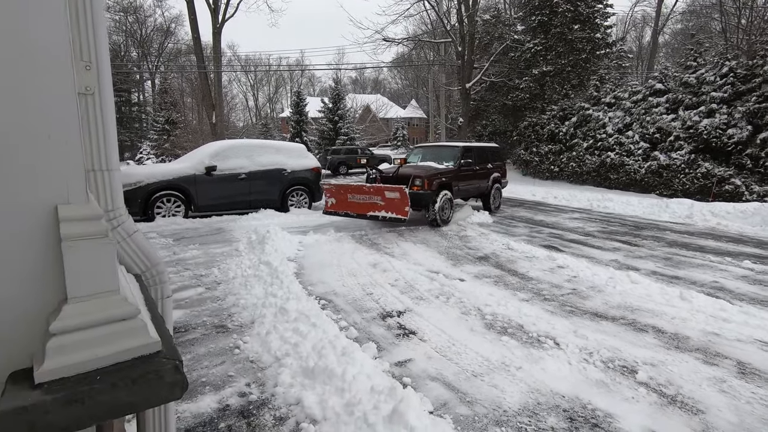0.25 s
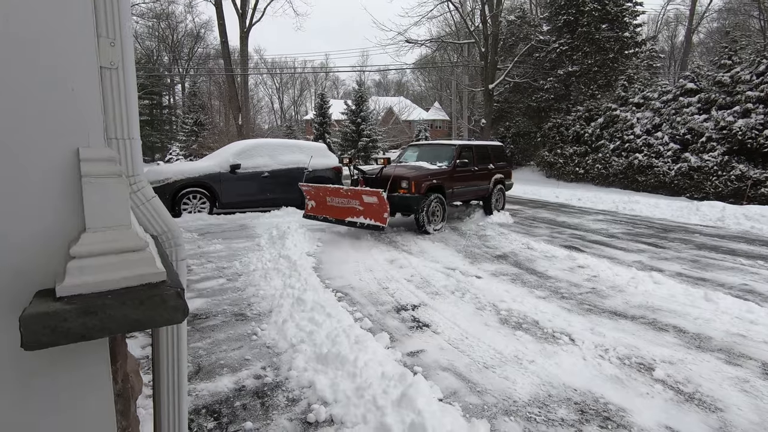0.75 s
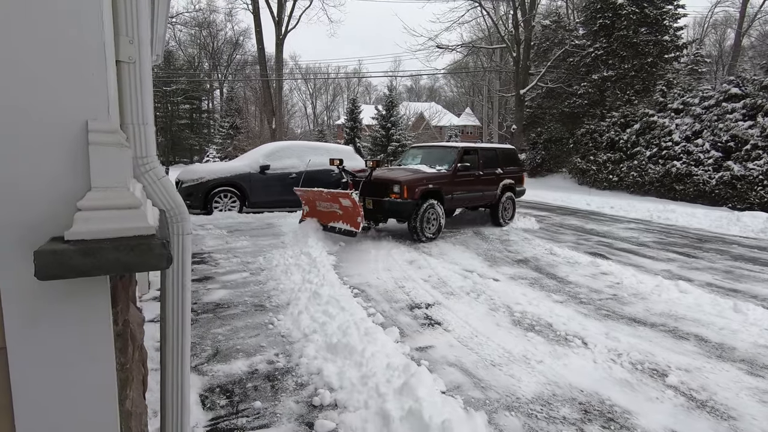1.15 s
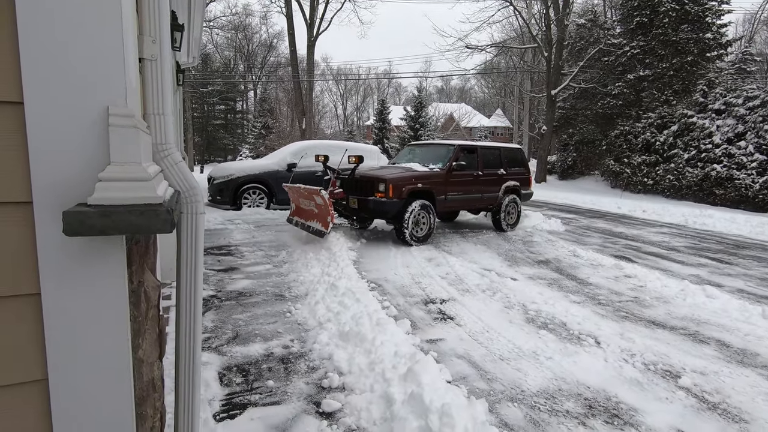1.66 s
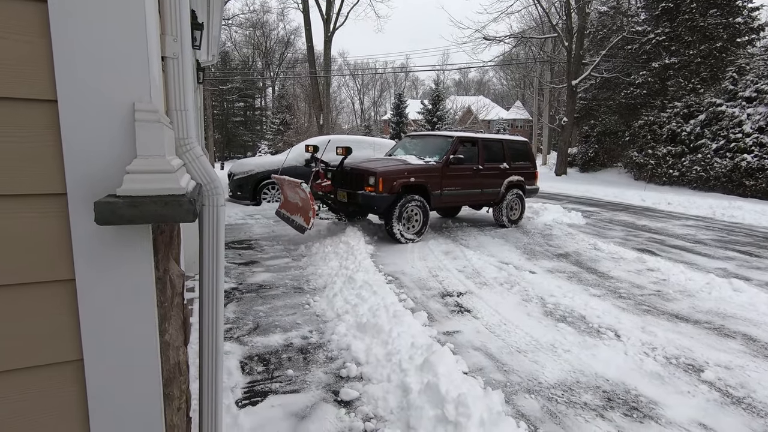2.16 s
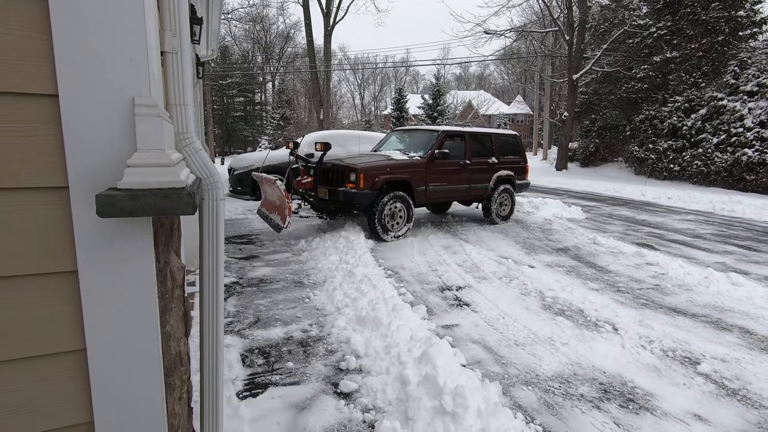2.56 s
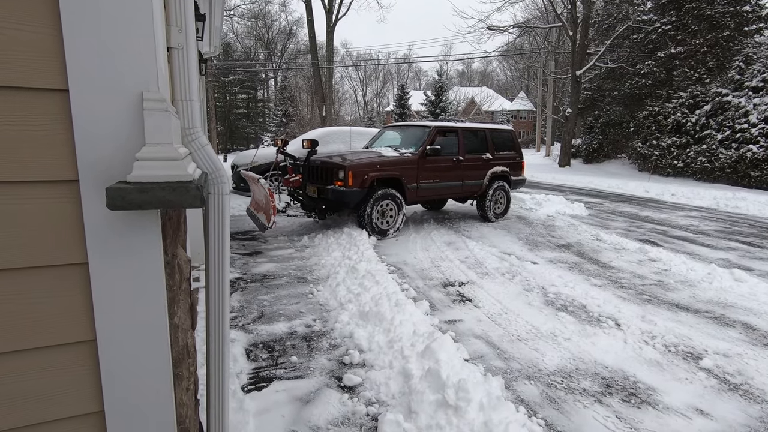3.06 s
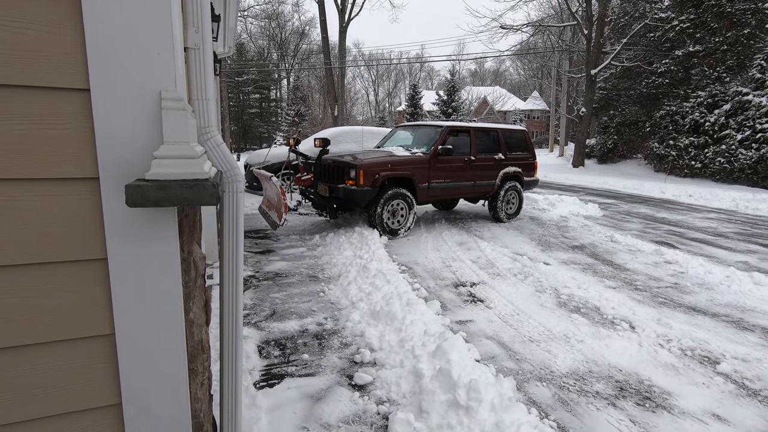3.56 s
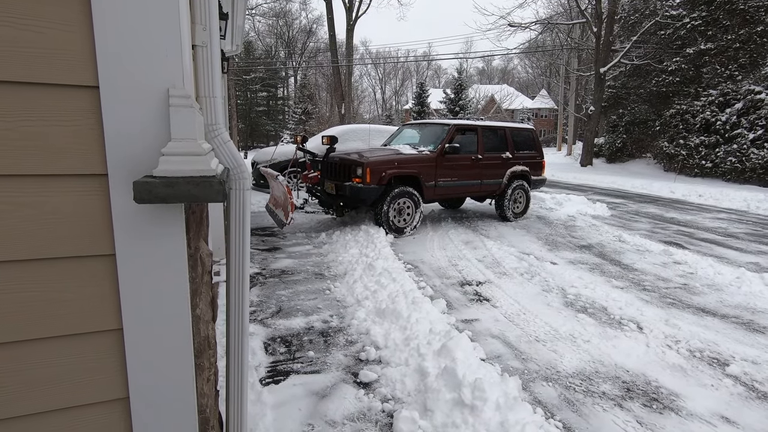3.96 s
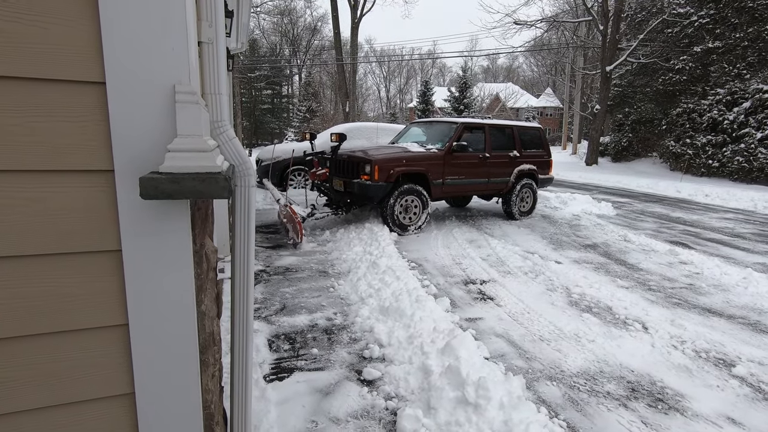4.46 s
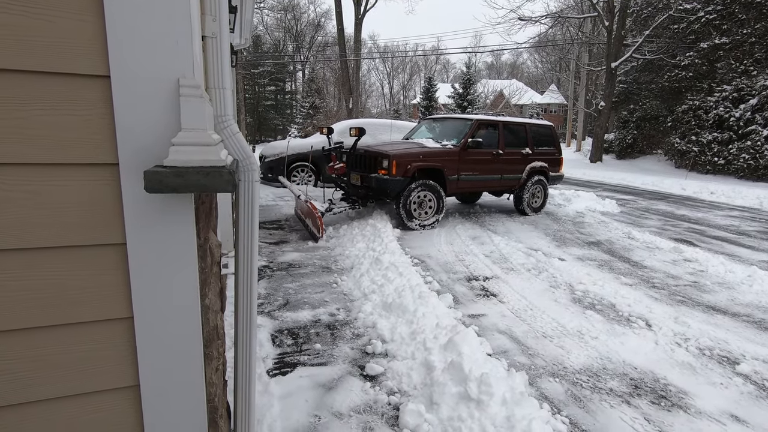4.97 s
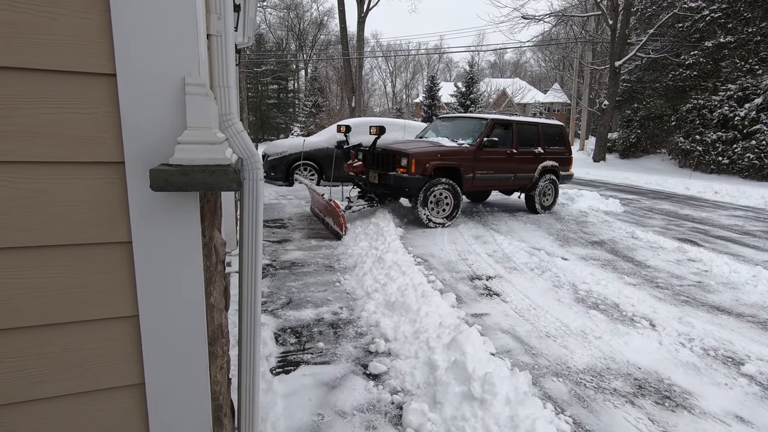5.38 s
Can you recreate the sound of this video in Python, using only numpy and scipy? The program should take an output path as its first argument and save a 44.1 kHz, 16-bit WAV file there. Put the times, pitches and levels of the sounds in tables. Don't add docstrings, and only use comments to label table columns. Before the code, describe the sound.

A truck engine booms low and unevenly over crunching snow, a pump whirs briefly, then a steel plow blade bangs down and scrapes pavement.

```python
import sys
import numpy as np
from scipy import signal
from scipy.fft import rfft, irfft, next_fast_len
from scipy.io import wavfile
from scipy.ndimage import uniform_filter1d, map_coordinates

SR = 44100
rng = np.random.default_rng(int(sys.argv[2]) if len(sys.argv) > 2 else 0)


def wav_out(sig):
    wavfile.write(sys.argv[1], SR, np.round(np.clip(np.atleast_2d(sig).T, -1, 1) * 32767).astype(np.int16))


def rack_gain(trim_db):
    fader = np.asarray(trim_db, float)
    return 10 ** (fader / 20)


N = 247842
T = np.arange(N) / SR

# time in seconds, crunch in dB over the mean pace.
SNOW_PACE = [
    (0, 0.3),
    (.24, 5),
    (.74, 2.3),
    (1.18, 6.5),
    (1.42, 7.5),
    (1.74, 2.5),
    (2.21, -2.5),
    (3.5, -10),
    (3.91, -7),
    (4.36, -1),
]
# frequency in Hz, level in dB per Hz.
CRUNCH_COLOUR = [(880, -31), (1500, -14), (1750, 2), (1910, -8), (2480, -10.5), (3060, -9), (4030, -12),
                 (4330, -16.5), (7210, -14.5), (10400, -38.5), (13500, -74), (22000, -120)]
# frequency in Hz, level in dB.
ALTERNATOR_CASE = [(1370, -50.5), (1700, -44.5), (1900, -46.5), (2060, -55)]
# frequency in Hz, level in dB per Hz.
CLATTER_COLOUR = [(160, -25.5), (280, -16), (361, -8), (437, -1.5), (470, -4.5), (506, -3), (993, -10.5),
                  (1380, -9), (2070, -17), (3120, -15.5), (5000, -29), (6500, -57), (11000, -120)]
# time in seconds, half the firing rate in Hz, throttle in dB.
ENGINE_SPEED = [(0, 26, -7), (.21, 25.8, -5), (.45, 28.7, -6), (.75, 25.1, -7), (.96, 22.5, -4),
                (1.17, 21.3, 0), (1.6, 21.2, 1), (2.1, 19.7, 0), (2.5, 19.5, 0), (3.3, 19.2, 0),
                (3.55, 18.2, 0), (3.72, 19.5, 1), (3.94, 21.8, 0), (4.32, 22.3, 1), (4.56, 26.1, 0),
                (4.85, 27.1, -1), (5.3, 27.6, 0), (5.62, 28.9, -4)]
# multiple of the pump tone, level in dB.
PUMP_OVERTONES = [(1, 1), (2, 1), (3, -5), (4, -9), (5, -6)]
# frequency in Hz, level in dB.
PUMP_HOUSING = [(450, 3), (800, 2), (1000, -8), (1300, -6), (1500, 3), (1800, -4), (2300, 2), (2700, -2),
                (3400, 1), (4100, -1)]
# time in seconds, frequency in Hz, level
# in dB, length in seconds.
BRIEF_TONES = [
    (1.383, 3400, -44, 0.035),
    (3.608, 3770, -53, 0.031),
    (3.54, 445, -48.5, 0.44),
    (4.45, 7260, -50, 0.023),
    (4.465, 7260, -36, 0.023),
    (4.465, 6200, -43, .03),
]
# time in seconds, then hollow part, bright part and low part in dB.
LINK_KNOCKS = [(0.09, -41.5, -45, -42), (0.21, -42, -39, -53.5), (0.675, -28, -52.5, -31),
               (0.74, -24, -52.5, -33), (0.772, -38, -63, -29.5), (0.809, -27.5, -48, -29),
               (0.882, -36, -52.5, -30), (1.305, -41.5, -36, -35.5), (1.491, -29, -49.5, -45),
               (1.549, -36, -49.5, -44.5), (1.599, -40.5, -45.5, -43), (2.099, -43, -45.5, -50.5),
               (2.273, -35.5, -43, -53), (2.867, -45.5, -58.5, -58), (3.348, -45.5, -47.5, -57.5),
               (3.539, -49.5, -47.5, -55), (4.003, -36, -46, -42.5), (4.044, -44.5, -47.5, -33.5)]
# frequency in Hz, width in Hz, level in dB.
FRAME_NOTES = [(460, 67, -0.5), (670, 78, -3.5), (1140, 98, -14)]
# frequency in Hz, level in dB.
FIRING_BOOM = [(36, -42), (39, -37.5), (42.4, -32), (47.5, -30.5), (52, -30.5), (54.5, -30.5), (56.2, -22),
               (58, -24)]
# frequency in Hz, level in dB.
UNEVEN_BOOM = [(55, -62), (64, -40.5), (72, -32.5), (78, -27), (88, -32.5)]
# frequency in Hz, level in dB.
SECOND_BOOM = [(73, -15.5), (77, -15.5), (79, -18), (85, -22.5), (88, -24.5), (104, -23), (110, -22.5),
               (116, -25)]
# frequency in Hz, level in dB.
FOURTH_BOOM = [(146, -46.5), (158, -41), (170, -36.5), (182, -39), (230, -39.5)]
# multiple of half the firing rate, level in dB.
UPPER_TONES = [(5, 2), (6, -1), (7, -8), (9, -4), (10, -2), (11, -8), (12, -8), (13, -11)]
# frequency in Hz, level in dB.
SILENCER = [(15, -1), (200, 0), (240, -7.5), (290, -27.5), (400, -47)]
# frequency in Hz, level in dB per Hz.
PUFF_COLOUR = [(12, -14), (25, -2), (45, -9), (76, -8), (110, -7), (170, 0), (230, -3), (300, -13),
               (420, -40)]
# time in seconds, level in dB.
LANDINGS = [
    (4.41, -8.5),
    (4.468, -20),
    (4.558, -33),
    (4.844, -33),
    (5.587, -29),
]
# frequency in Hz, level in dB, time to fade by 60 dB in seconds.
THUD_NOTES = [(165, -1, .13), (221, -1, .22), (250, -5, .15), (280, 0, .15), (345, -7, .22), (480, -13, .2),
              (635, -10, .25), (1184, -14, .1), (1430, -16, .12)]
# frequency in Hz, width in Hz, level in dB.
SLAM_NOTES = [(170, 70, -1), (235, 70, 0)]
# time in seconds, clang in dB, rattle in dB.
BLOWS = [(4.403, -24.5, -53.5), (4.409, -17, -40.5), (4.418, -23, -42), (4.436, -29.5, -31),
         (4.456, -23.5, -26.5), (4.468, -28.5, -30), (4.482, -25, -34), (4.557, -36.5, -37.5),
         (4.572, -33, -43.5), (4.59, -48, -72.5), (4.844, -28, -50), (4.904, -33.5, -42),
         (5.587, -21.5, -57)]
# frequency in Hz, width in Hz, level in dB.
CLANG_NOTES = [(660, 110, 5.5), (1133, 790, -3.5), (1650, 780, -3), (2940, 980, -10.5)]
# frequency in Hz, width in Hz, level in dB.
RATTLE_NOTES = [(3740, 1500, 3), (5280, 830, -0.5), (6200, 690, -5), (7260, 180, -1), (8800, 1800, -14),
                (12500, 4000, -30.5)]
# time in seconds, pressure in dB.
SCRAPE_PRESSURE = [
    (4.495, -0.5),
    (4.55, -8),
    (4.565, -2.5),
    (4.83, -8),
    (4.857, 0.6),
    (4.907, 4.5),
    (5.449, 9.5),
    (5.577, -7),
    (5.595, 1),
]
# frequency in Hz, width in Hz, level in dB.
PLATE_NOTES = [(140, 49, -0.5), (198.5, 56, -1), (251.8, 24.4, 3.5), (346, 5.2, -25.5)]
# frequency in Hz, width in Hz, level in dB.
EDGE_NOTES = [(494, 23, -8.5), (612, 25, -4), (670, 18.5, 1), (785, 55, -2.5), (879, 37, -5.5),
              (927, 64, -4), (1028, 22, -7), (1092, 33, -8.5), (1255, 30, -12), (1492, 84, -9.5),
              (1663, 160, -18), (2060, 560, -29)]
# frequency in Hz, width in Hz, level in dB.
RIM_NOTES = [(1370, 840, -12), (2070, 730, -12), (2646, 270, -7), (3080, 66, -10), (3270, 110, -13),
             (3970, 1500, -22.5), (5000, 680, -24.5), (6900, 2200, -33.5)]
# start in seconds, frequency in Hz, width in Hz, level in dB.
WEAR_STRIP = (4.84, 2230, 60, -7)
# frequency in Hz, level in dB.
DEAD_BANDS = [(340, -2.5), (430, -1.5), (540, -0.5), (2300, 1), (2400, -7), (2500, -2.5), (3400, -1.5),
              (3900, -3.5), (7200, -5), (9500, -5.5)]
# frequency in Hz, time to fade by 60 dB in seconds.
YARD_ECHO = [(100, 0.12), (1000, 0.39), (8000, 0.078)]
# frequency in Hz, side minus mid in dB.
ECHO_WIDTH = [(60, -30), (110, -27), (190, -34.5), (330, -22.5), (580, -15.5), (1030, -10.5), (1810, -10.5),
              (3190, -15), (5630, -4.5), (9930, 7.5)]
# frequency in Hz, left minus right in dB.
LEFT_LEAN = [(100, 2), (300, -0.9), (700, -0.5), (1400, -2.5), (2800, 0.7), (5000, -4), (9000, -6)]
# frequency in Hz, level in dB.
MICROPHONE = [(20, -4), (40, 1), (8000, -2.5), (10000, -13.5), (11500, -25), (16000, -21)]


def unit(x):
    return x / np.sqrt(np.mean(x ** 2) + 1e-20)


def along(points, hz):
    f, v = np.transpose(points)
    return np.interp(np.log(hz + 1), np.log(f + 1), v)


def curves(rows):
    s, *cols = np.transpose(rows)
    return [np.interp(T, s, c) for c in cols]


def ramp(start_s, length_s):
    return np.clip((T - start_s) / length_s, 0, 1)


def wobble(rate):
    return map_coordinates(rng.standard_normal(int(N * rate / SR) + 4), [T * rate])


def filtered(x, response):
    m = next_fast_len(N + SR // 2)
    return irfft(rfft(x, m) * response(np.fft.rfftfreq(m, 1 / SR)), m)[..., :N]


def coloured(x, points):
    return filtered(x, lambda hz: rack_gain(along(points, hz)))


def resonant(x, modes):
    def response(f):
        total = 0
        for k, (centre, width, db) in enumerate(modes):
            peak = 1j * f * width / (centre * centre - f * f + 1j * f * width)
            total = total + (-1) ** k * rack_gain(db) * peak
        return total
    return filtered(x, response)


def grit(fine_db, lump_db, lump_rate):
    return unit(rng.standard_normal(N) * rack_gain(fine_db * wobble(500) + lump_db * wobble(lump_rate)))


def ring(modes, t):
    return sum(rack_gain(db - 60 * t / t60) * np.sin(2 * np.pi * hz * t) for hz, db, t60 in modes)


def burst(db, t60, t):
    return rack_gain(db - 60 * t / t60) * rng.standard_normal(len(t))


def add_at(track, start_s, sound):
    track[round(start_s * SR):][:len(sound)] += sound


def engine_turning():
    half_hz = curves(ENGINE_SPEED)[0]
    return 2 * np.pi * np.cumsum(half_hz * (1 + .003 * wobble(25))) / SR


def snow_crunch():
    pace_db, = curves(SNOW_PACE)
    return rack_gain(-53.5 + pace_db) * unit(coloured(grit(1.37, 0.91, 14), CRUNCH_COLOUR))


def alternator(turn):
    poles = 72
    half_hz = curves(ENGINE_SPEED)[0]
    whine_db = along(ALTERNATOR_CASE, poles * half_hz) - 13 * ramp(0.89, 0.4)
    return rack_gain(whine_db + 2.5 * wobble(30)) * np.cos(poles * turn + 1.3 * wobble(90))


def valve_clatter(turn):
    pace_db, = curves(SNOW_PACE)
    ticks = grit(1.6, 0.81, 9) * (1 + 0.05 * np.cos(2 * turn))
    return rack_gain(-46.5 + 0.56 * pace_db) * unit(coloured(ticks, CLATTER_COLOUR))


def pump():
    on_s, off_s, end_s, edge_s = .780, 1.320, 1.510, .06
    start_hz, rise_hz, spin_up_s, sag_hz_per_s = 430.0, 400.0, .250, 1650
    running = np.clip(T - on_s, 0, 1)
    hz = start_hz + rise_hz * np.tanh(running / spin_up_s) - sag_hz_per_s * np.clip(T - off_s, 0, .25)
    gain = rack_gain(-47 - 9 * running) * ramp(on_s, edge_s) * (1 - ramp(end_s - edge_s, edge_s))
    turn = 2 * np.pi * np.cumsum(hz) / SR + .2 * wobble(70)
    hum = np.zeros(N)
    for k, db in PUMP_OVERTONES:
        hum += rack_gain(db + along(PUMP_HOUSING, k * hz) + 2.5 * wobble(25)) * np.cos(k * turn)
    return gain * hum


def brief_tones():
    total = np.zeros(N)
    for s, hz, db, length in BRIEF_TONES:
        swell = np.exp(-((T - s) / length * 2) ** 2)
        total += rack_gain(db) * swell * np.cos(2 * np.pi * hz * T)
    return total


def links():
    dull, bright, low = np.zeros((3, N + SR))
    t = T[:SR // 8]
    for s, db, bright_db, low_db in LINK_KNOCKS:
        add_at(dull, s, burst(db + 19.0, 0.09, t))
        add_at(bright, s, burst(bright_db + 6, 0.08, t))
        add_at(low, s, burst(low_db + 25.5, 0.087, t))
    hollow = resonant(dull[:N], FRAME_NOTES)
    tick = resonant(bright[:N], [(2900, 500, 6.5), (6500, 3000, -19)])
    push = resonant(low[:N], [(242, 39, 0.003)])
    return hollow + tick + push


def exhaust_tone(turn, k, db, lag, flutter_db):
    return np.sqrt(2) * rack_gain(db + flutter_db * wobble(15)) * np.cos(k * turn - lag)


def exhaust_boom(turn):
    half_hz, throttle_db = curves(ENGINE_SPEED)
    speeding_up = uniform_filter1d(np.gradient(half_hz) * SR, size=SR // 12)
    pull_db = 0.35 * np.clip(speeding_up, -9, 9)
    firing_db = along(FIRING_BOOM, 2 * half_hz) + pull_db + 0.092 * throttle_db
    uneven_db = along(UNEVEN_BOOM, 3 * half_hz) + pull_db
    second_db = along(SECOND_BOOM, 4 * half_hz) + throttle_db
    fourth_db = along(FOURTH_BOOM, 8 * half_hz) + 1.3 * throttle_db
    boom = exhaust_tone(turn, 2, firing_db, 0, 1.2) + exhaust_tone(turn, 3, uneven_db, 0.94, 1.6)
    return boom + exhaust_tone(turn, 4, second_db, 0.9, .3) + exhaust_tone(turn, 8, fourth_db, 1.2, 3)


def exhaust_growl(turn):
    half_hz, throttle_db = curves(ENGINE_SPEED)
    pace_db, = curves(SNOW_PACE)
    upper = np.zeros(N)
    for k, db in UPPER_TONES:
        lag = .9 * k * k + .4 * wobble(22)
        upper += exhaust_tone(turn, k, db + along(SILENCER, k * half_hz), lag, 2.8)
    gas = rng.standard_normal(N) * (1 + 0.45 * np.cos(2 * turn))
    pipe_note = unit(resonant(resonant(gas, [(74.14, 1.6, 0)]), [(74.2, 1.4, 0)]))
    puffs = unit(coloured(gas, PUFF_COLOUR))
    growl = rack_gain(-36 + 0.47 * pace_db + 0.52 * throttle_db)
    return rack_gain(-36) * pipe_note + growl * (rack_gain(-5) * upper + rack_gain(-5.5) * puffs)


def blade_landing():
    thuds, slams = np.zeros((2, N + SR))
    t = T[:SR // 3]
    soft = 1 - np.exp(-t / .002)
    for s, db in LANDINGS:
        add_at(thuds, s, soft ** 2 * rack_gain(db) * ring(THUD_NOTES, t))
        add_at(slams, s, soft * burst(db + 15, .16, t))
    return thuds[:N] + resonant(slams[:N], SLAM_NOTES)


def blade_blows():
    clangs, shakes = np.zeros((2, N + SR))
    t = T[:SR // 3]
    soft = 1 - np.exp(-t / .002)
    for s, clang_db, rattle_db in BLOWS:
        add_at(clangs, s, soft * burst(clang_db + 14.5, 0.15, t))
        add_at(shakes, s, soft * burst(rattle_db + 8.0, 0.12, t))
    return resonant(shakes[:N], RATTLE_NOTES) + resonant(clangs[:N], CLANG_NOTES)


def blade_scrape():
    touch = np.clip((T - SCRAPE_PRESSURE[0][0]) / 0.06 + 1, 0, 1)
    press_db, = curves(SCRAPE_PRESSURE)
    drag = grit(2.9, 1.5, 30)
    drum = unit(resonant(grit(0.95, 0.87, 29), PLATE_NOTES))
    grind = unit(resonant(drag, EDGE_NOTES))
    rim = unit(resonant(drag, RIM_NOTES))
    start_s, hz, width_hz, song_db = WEAR_STRIP
    song = rack_gain(song_db) * (T > start_s) * unit(resonant(drag, [(hz, width_hz, 0)]))
    hiss = [(12500, 3000, 0)]
    ice_spray = rack_gain(-33) * unit(resonant(resonant(drag, hiss), hiss))
    rub = rack_gain(-30 + 0.91 * press_db) * drum + rack_gain(-33 + press_db) * grind
    rub = rub + rack_gain(-34 + 0.59 * press_db) * (rim + song + ice_spray)
    return coloured(touch * rub, DEAD_BANDS)


def yard(x):
    hz, _, z = signal.stft(rng.standard_normal((2, SR // 3)), SR, nperseg=256)
    t = _
    fading = z * rack_gain(-60 * t / along(YARD_ECHO, hz)[:, None])
    tail = signal.istft(fading, SR, nperseg=256)[1]
    wet = signal.fftconvolve(x[None], tail / np.linalg.norm(tail[0]), axes=1)[:, :N]
    mid = x + rack_gain(-12.5) * wet[0]
    side = coloured(wet[1], ECHO_WIDTH)
    halves = np.array([[.5], [-.5]])
    return filtered(np.array([mid + side, mid - side]), lambda f: rack_gain(along(LEFT_LEAN, f) * halves))


def scene():
    turn = engine_turning()
    rolling = snow_crunch() + alternator(turn) + valve_clatter(turn)
    plow = pump() + brief_tones() + links()
    exhaust = exhaust_boom(turn) + exhaust_growl(turn)
    blade = blade_landing() + blade_blows() + blade_scrape()
    return exhaust * rack_gain(np.array([[-.15], [.15]])) + yard(rolling + plow + blade)


def low_pass(x):
    return signal.sosfilt(signal.butter(12, 15000, fs=SR, output="sos"), x)


def record(dry):
    duck_from_db, duck_share, memory_s = -14, 1.1, .05
    memory = int(memory_s * SR) // 2 * 2 + 1
    power = uniform_filter1d(dry.mean(axis=0) ** 2, size=memory, origin=memory // 2)
    recent_db = 10 * np.log10(np.abs(power) + 1e-9)
    ducked = dry * rack_gain(-duck_share * np.clip(recent_db - duck_from_db, 0, 12))
    return low_pass(coloured(ducked, MICROPHONE))


dry = scene()
out = record(dry)
wav_out(out)
```